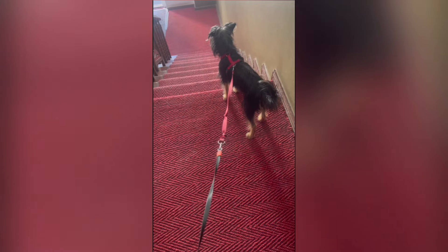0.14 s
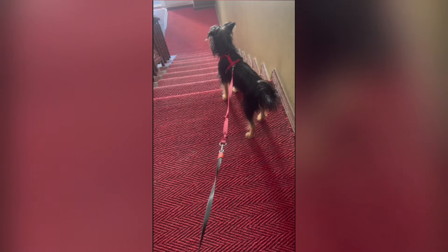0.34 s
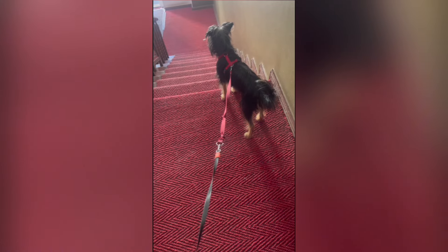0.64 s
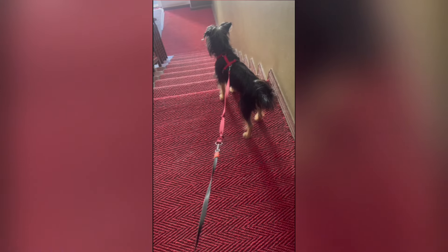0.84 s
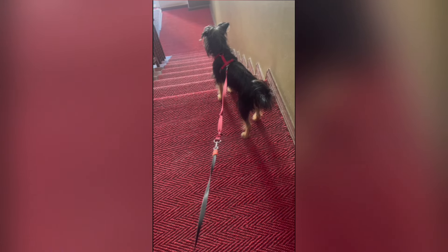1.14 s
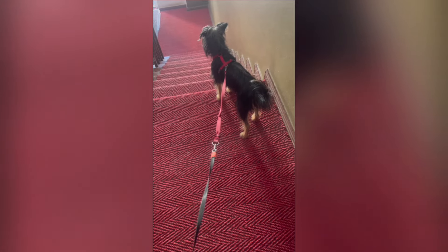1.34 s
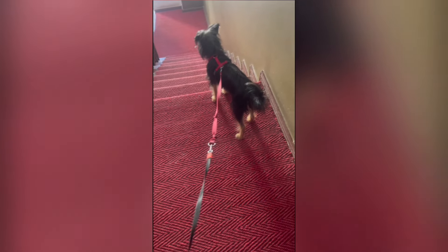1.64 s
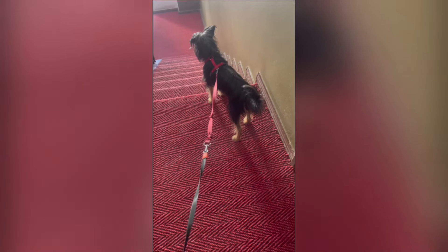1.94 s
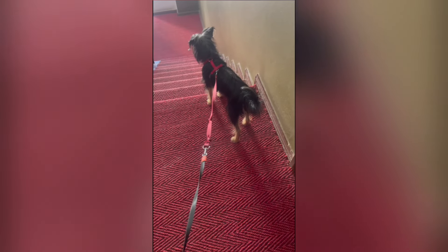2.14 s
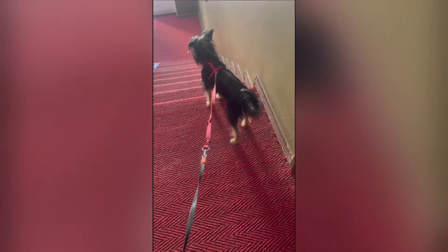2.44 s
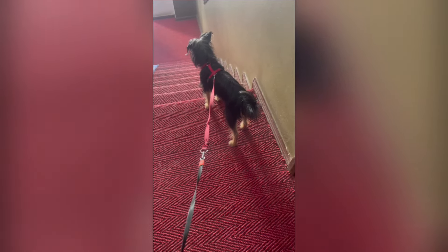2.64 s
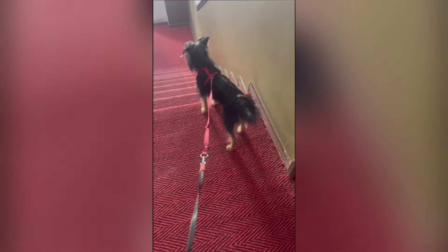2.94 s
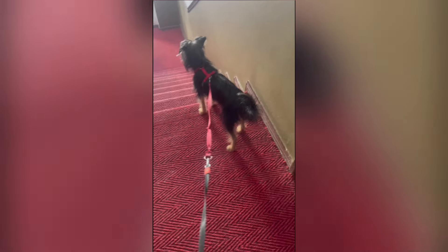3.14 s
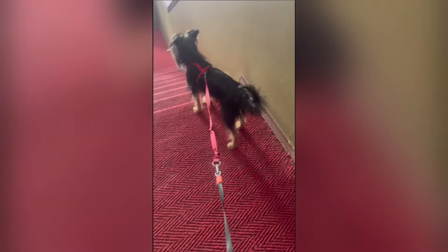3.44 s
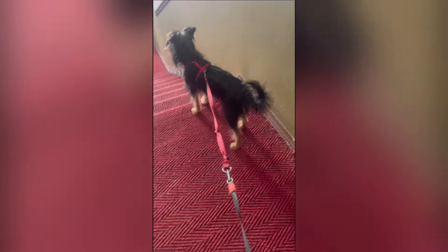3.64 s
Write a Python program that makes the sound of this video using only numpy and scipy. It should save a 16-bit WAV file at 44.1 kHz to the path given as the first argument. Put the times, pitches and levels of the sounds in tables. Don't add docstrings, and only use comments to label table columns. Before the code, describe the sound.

A small dog whines in a carpeted stairwell with short reverberation and low rumble. A soft grunt opens, then a thin nasal whistle at 0.25 s; weak grunts and faint sniffs follow until 1.1. Leash clicks at 1.2 and 1.45 accompany a hissing whistle, breaking into a falling yelp at 1.8. More whistling leads to a second yelp at 2.55. After a click at 3.2, a long whine slides down to the end over paw thuds.

```python
import sys
import numpy as np
from scipy import signal
from scipy.fft import rfft, irfft
from scipy.io import wavfile
from scipy.ndimage import uniform_filter1d

SR = 44100
rng = np.random.default_rng(int(sys.argv[2]) if len(sys.argv) > 2 else 0)


def makeup_ratio(level_db):
    decades = np.asarray(level_db, float) / 20
    return 10 ** decades


def materialize(psi):
    bounded = np.clip(np.atleast_2d(psi).T, -1, 1)
    quanta = np.round(bounded * 32767).astype(np.int16)
    wavfile.write(sys.argv[1], SR, quanta)


N = 167580

# frequency in Hz, density in dB per Hz.
AIR_SPECTRUM = [(30, -29), (130, 6), (300, 14.5), (3400, -7), (7800, -14), (8800, -35.5), (13200, -63)]
# frequency in Hz, density in dB per Hz.
HOUSE_SPECTRUM = [(30, -36.5), (55, 10.5), (110, -6), (250, -1.5), (500, -22), (4000, -34), (12500, -40),
                  (13200, -81)]
AIR_DB, HOUSE_DB = -59.5, -52.5
# time in seconds, boost in dB.
FOOTFALL_SWELL = [(0, 13.5), (0.398, 6), (1.05, 2.5), (1.249, -6), (2.402, -2), (2.696, 5.5), (3.8, 3.5)]

# time in seconds, pitch in Hz, level in dB, breathiness
GRUNTS = [
    [(0, 416.5, -34, 0.09), (.04, 389, -46.5, 0.85), (.07, 352, -49.5, 0.7)],
    [(0, 1061, -47, 0.8), (.05, 1056, -47, 0.21)],
    [(.475, 527, -78, 0.16), (.5, 504, -48.5, 0), (.58, 431.5, -47, 0.6), (.67, 409, -56.5, 0.5),
     (.8, 375, -64, 1)],
    [(.85, 373.5, -47.5, 0.64), (.87, 370, -57.5, 1), (.91, 370.6, -83.5, 0.92), (.955, 397, -50, 1),
     (.98, 338.4, -43.5, 0.2), (1.03, 336, -49.5, 0.02), (1.085, 354, -74, 0.15)],
]
# time in seconds, pitch in Hz, level in dB, breathiness from 0 to 1.
YELPS = [
    [(1.6, 1371, -67.5, 0.5), (1.64, 1346, -67, 0.8), (1.8, 1275, -65, 0.66), (1.812, 1303, -23, 0),
     (1.822, 1066, -15, 0.12), (1.832, 894.7, -37, 0.98), (1.855, 595, -33, 1), (1.875, 457, -80, 0.8)],
    [(2.515, 1142, -57.5, 0), (2.533, 1171, -18, .01), (2.56, 1145, -19.5, 0), (2.573, 1078, -14.5, 0.02),
     (2.585, 979.2, -30.5, 0.2), (2.62, 456.6, -30, 0.65), (2.635, 376.2, -16.5, 0.01),
     (2.665, 338, -32, 0.2), (2.7, 355, -53, .1)],
]
# time in seconds, pitch in Hz, level in dB.
LONG_WHINE = [(3.245, 1288, -50), (3.274, 1277, -32.5), (3.302, 1200, -21), (3.344, 1150, -30),
              (3.383, 1083, -19.5), (3.497, 1037, -20.5), (3.599, 934, -21.5), (3.682, 861.6, -23.5),
              (3.81, 900.5, -18.5)]
# frequency in Hz, gain in dB.
THROAT = [(370, 9), (750, -7), (1150, -5), (1700, -38), (2400, -27), (3800, -44.5), (5700, -28),
          (12000, -75)]
# frequency in Hz, gain in dB.
WHINE_THROAT = [(1100, 0), (2200, -22), (2480, -36), (3230, -25), (3620, -48), (4780, -26), (5500, -26),
                (8000, -31)]
# frequency in Hz, gain in dB.
BREATH_COLOUR = [(150, -55), (350, -12), (1000, -2.5), (1800, -27.5), (2700, -4.5), (4000, -25),
                 (5500, -15), (13000, -48.5)]

# frequency in Hz, time to fall 60 dB in seconds.
STAIRWELL_RING = [(350, 0.64), (1000, 0.34), (2500, 0.25), (6000, 0.3), (14000, 0.24)]

# time in seconds, peak in dB, centre in Hz, length in seconds.
TICKS = [
    (0.157, -59, 1500, 0.11),
    (0.254, -54.5, 2000, 0.028),
    (3.1, -58, 600, 0.066),
    (3.13, -58, 1300, 0.059),
    (3.2, -51, 4000, .012),
    (3.215, -55.5, 1550, 0.049),
    (3, -52, 4000, .015),
    (1.55, -51.5, 8100, .015),
    (1.3, -63, 850, 0.018),
    (1.1, -62.5, 980, 0.01),
]
# frequency in Hz, gain in dB.
NOSE_COLOUR = [(2500, -21), (4300, -5.5), (5200, 11), (6300, 5.5), (8000, 5), (12500, -19.5),
               (13000, -27.5), (15500, -31)]
# time in seconds, level in dB.
AIRFLOW = [(0.201, -76), (.27, -48), (0.399, -76), (1.298, -82.5), (1.36, -63), (1.53, -47), (1.802, -45),
           (1.861, -77), (2.058, -73.5), (2.13, -55.5), (2.582, -45.5), (2.681, -80), (2.85, -73.5),
           (2.931, -51.5), (3.1, -60), (3.349, -46), (3.8, -61)]
# time in seconds, pitch in Hz, level in dB.
WHISTLES = [
    [(.225, 5400, -61), (.242, 5159, -38.5), (.28, 5230, -26), (.3, 5150, -37.5), (.33, 4950, -45.5),
     (.37, 4630, -43)],
    [(1.3, 4900, -55), (1.345, 5653, -34), (1.4, 5900, -31.5), (1.462, 6280, -27.5), (1.485, 6060, -28),
     (1.505, 5846, -26.5), (1.56, 6040, -29.5), (1.634, 6260, -42), (1.79, 6276, -51.5)],
    [(2.06, 5900, -71), (2.1, 6210, -33.5), (2.16, 6344, -34.5), (2.2, 6150, -36), (2.235, 5630, -32.5),
     (2.34, 5822, -35.5), (2.365, 5918, -31), (2.45, 5830, -31.5), (2.59, 5740, -62.5)],
    [(2.86, 6060, -91), (2.9, 5907, -35), (2.956, 5881, -33), (3.01, 5752, -42), (3.08, 5964, -68)],
    [(3.275, 6050, -59), (3.3, 5950, -28.5), (3.33, 5880, -36), (3.365, 5850, -49)],
]
# time in seconds, pitch in Hz, level in dB.
SQUEAKS = [
    [(.24, 15900, -69), (.3, 15200, -66), (.345, 15100, -70)],
    [(1.32, 14840, -68), (1.44, 14730, -67)],
    [(1.46, 14400, -60.5), (1.5, 14700, -56), (1.6, 14900, -60.5), (1.85, 15200, -59.5)],
    [(2.3, 13400, -77), (2.51, 14950, -50.5), (2.64, 14850, -69.5)],
    [(3.2, 14270, -82), (3.32, 15200, -58), (3.56, 14500, -78.5)],
]
# time in seconds, level in dB.
SNIFFS = [
    (0.857, -70.5),
    (0.919, -63.5),
    (0.957, -58.5),
]
SNIFF_HZ = [2520, 5230, 5900, 7500]
# time in seconds, peak in dB, centre in Hz.
CLIP_SNAPS = [
    (1.228, -31, 2530),
    (1.455, -31, 2050),
    (3.202, -31, 3980),
]
# time in seconds, peak in dB, centre in Hz.
THUDS = [
    (3.414, -48, 493),
    (3.499, -34.5, 463),
    (3.663, -33, 513),
    (3.793, -38.5, 907),
]

# frequency in Hz, left over right in dB.
SIDE_TILT = [(60, -.4), (300, 2.7), (1100, -1.8), (2500, .6), (5000, -.3), (8000, 0)]
# frequency in Hz, left lead in radians.
PORT_PHASE = [(300, -0.21), (3500, 1.22), (6000, 1.27), (7200, 1.91)]
# frequency in Hz, radians short of opposed.
TREBLE_SHORTFALL = [(8500, .45), (11000, .5), (12200, .75), (15000, 1.0)]

PITCH_WAVER = 0.0028
FLICKER_DB, FUZZ = 3.5, 0.4


def evened(x):
    return x / np.sqrt(np.mean(x ** 2) + 1e-20)


def read(points, hz):
    f, value = np.transpose(points)
    return np.interp(np.log(hz + 1), np.log(f + 1), value)


def add(mix, s, sound):
    part = mix[round(s * SR):][:len(sound)]
    part += sound[:len(part)]


def colour(x, gain):
    spectrum = rfft(x) * gain(np.fft.rfftfreq(x.shape[-1], 1 / SR))
    return irfft(spectrum, x.shape[-1])


def octave_band(hz, octaves):
    return lambda f: np.exp(-(np.log2((f + 1) / hz) / octaves) ** 2)


def flicker(n, rate_hz):
    wander = colour(rng.standard_normal(SR), lambda f: np.exp(-(f / rate_hz) ** 2))
    return evened(wander)[:n]


def unroll(rows):
    rows = np.array(rows, float)
    t = np.arange(rows[0, 0], rows[-1, 0], 1 / SR)
    controls = [uniform_filter1d(np.interp(t, rows[:, 0], v), size=150) for v in rows.T[1:]]
    hz = controls[0]
    wobble = evened(uniform_filter1d(rng.standard_normal(SR), size=300))[:len(t)]
    phase = 2 * np.pi * np.cumsum(hz * (1 + PITCH_WAVER * wobble)) / SR
    fade_in = np.clip((t - t[0]) / 0.00074, 0, 1)
    fade_out = np.clip((t[-1] - t) / 0.002, 0, 1)
    level = makeup_ratio(controls[1]) * fade_out * fade_in
    return t[0], hz, phase, level, controls[-1]


def drone(spectrum, db, patchy_db):
    frames, hz = N // 256 + 5, np.fft.rfftfreq(1024, 1 / SR)
    real, imaginary, patches = rng.standard_normal((frames, 513, 3)).T
    patches = uniform_filter1d(patches, size=8, axis=0)
    patches = evened(uniform_filter1d(patches, size=14, axis=1))
    swell = np.interp(np.arange(frames) * 256 / SR, *np.transpose(FOOTFALL_SWELL))
    swell = swell / (1 + (hz[:, None] / 500) ** 2)
    gain = makeup_ratio(read(spectrum, hz)[:, None] + patchy_db * patches + swell)
    noise = signal.istft((real + 1j * imaginary) * gain, nperseg=1024, noverlap=768)[1][:N]
    return makeup_ratio(db) * evened(noise)


def voice(rows, bright_db=0, fade_db=0, breath_db=0, breath_top_hz=20000, rough=0, throat=THROAT):
    s, hz, phase, level, breathy = unroll(rows)
    n = len(phase)
    brightness = makeup_ratio(bright_db + fade_db * np.arange(n) / SR - read(throat, hz))
    brightness = brightness * (level / level.max()) ** 0.44
    fundamental = (1 + rough * flicker(n, 87)) * np.sin(phase)
    overtones = 0
    for k in range(2, 16):
        weight = makeup_ratio(read(throat, k * hz) + FLICKER_DB * flicker(n, 6))
        overtones = overtones + weight * (1 + FUZZ * flicker(n, 89)) * np.sin(k * phase)
    tone = fundamental + brightness * overtones
    breath = colour(rng.standard_normal(SR),
                    lambda f: makeup_ratio(read(BREATH_COLOUR, f)) / (1 + (f / breath_top_hz) ** 4))
    breath = evened(breath)[:n] * (1 + 0.66 * np.cos(phase))
    return s, level * (np.sqrt(2) * tone + makeup_ratio(breath_db) * np.clip(breathy, 0, 1) * breath)


def stairwell(x):
    gap_s, room_db, apart_db, apart_top_hz = 0.0051, -5, -9, 7000
    taps = np.zeros((2, SR))
    at = np.arange(0, SR - 20, 20) + rng.integers(0, 20, (2, SR // 20 - (SR % 20 == 0)))
    np.put_along_axis(taps, at, rng.choice([-1., 1.], at.shape), 1)
    taps *= np.clip(np.arange(SR) / SR / gap_s - 1, 0, 1)
    hz, t, z = signal.stft(taps, SR, nperseg=256)
    decay = makeup_ratio(-60 * t / read(STAIRWELL_RING, hz)[:, None])
    tail = signal.istft(z * decay, SR, nperseg=256)[1]
    both, apart = signal.fftconvolve(x[None], tail / np.linalg.norm(tail[0]), axes=1)[:, :N]
    apart = colour(apart, lambda f: 1 / (1 + (f / apart_top_hz) ** 8))
    return makeup_ratio(room_db) * (both + makeup_ratio(apart_db) * np.array([apart, -apart]))


def tick(s, db, hz, length, octaves):
    t = np.arange(4096) / SR
    noise = colour(rng.standard_normal(4096), octave_band(hz, octaves))
    return s, makeup_ratio(db) * evened(noise) * np.minimum(t / 0.00023, 1) * np.exp(-t / length)


def nose():
    hiss = evened(colour(rng.standard_normal(N), lambda f: makeup_ratio(read(NOSE_COLOUR, f))))
    return hiss * makeup_ratio(np.interp(np.arange(N) / SR, *np.transpose(AIRFLOW)))


def whistle(rows):
    s, hz, phase, level, _ = unroll(rows)
    n = len(phase)
    tone = (1 + 0.55 * flicker(n, 70)) * np.sin(phase)
    octave_level = makeup_ratio(-26.5 + FLICKER_DB * flicker(n, 20))
    tone += octave_level * (1 + FUZZ * flicker(n, 200)) * np.sin(2 * phase)
    tremble = makeup_ratio(3.0 * flicker(n, 20))
    return s, level * np.sqrt(2) * tremble * tone


def squeak(rows):
    s, hz, phase, level, _ = unroll(rows)
    return s, level * np.sqrt(2) * flicker(len(phase), 450) * np.sin(phase)


def clip_snap(s, db, hz, octaves):
    snap = colour(signal.unit_impulse(1024, "mid"), octave_band(hz, octaves))
    return s - 512 / SR, makeup_ratio(db) * snap / abs(snap).max()


def scene():
    dog = nose()
    for rows in WHISTLES:
        add(dog, *whistle(rows))
    for rows in SQUEAKS:
        add(dog, *squeak(rows))
    for rows in GRUNTS:
        add(dog, *voice(rows, bright_db=-9.5, breath_db=-3.5, breath_top_hz=800, rough=0.5))
    for rows in YELPS:
        add(dog, *voice(rows))
    whine = [(*row, 0.025) for row in LONG_WHINE]
    add(dog, *voice(whine, bright_db=4, fade_db=-44, throat=WHINE_THROAT))
    for row in TICKS:
        add(dog, *tick(*row, octaves=0.78))
    for row in CLIP_SNAPS:
        add(dog, *clip_snap(*row, octaves=0.94))
    for s, db in SNIFFS:
        for hz in SNIFF_HZ:
            add(dog, *tick(s, db, hz, length=0.019, octaves=0.35))
    for row in THUDS:
        add(dog, *tick(*row, length=0.0057, octaves=0.87))
    air = drone(AIR_SPECTRUM, AIR_DB, patchy_db=1.5)
    room = stairwell(dog)
    house = drone(HOUSE_SPECTRUM, HOUSE_DB, patchy_db=2.0)
    return dog + room + house + np.array([air, -air])


def roll_off(x):
    return signal.sosfilt(signal.butter(12, 16720, fs=SR, output="sos"), x)


def record(dry):
    top_hz = 15750
    phase = list(map(tuple, PORT_PHASE)) + [(hz, np.pi - short) for hz, short in TREBLE_SHORTFALL]

    def port(f):
        return makeup_ratio(read(SIDE_TILT, f) / 2) * np.exp(0.5j * read(phase, f))

    left, right = np.pad(dry, ((0, 0), (SR, SR)), "reflect", reflect_type="odd")
    pair = np.array([colour(left, port), colour(right, lambda f: 1 / port(f))])
    mix = colour(pair, lambda f: f < top_hz)[:, SR:-SR]
    return roll_off(mix)


dry = scene()
out = record(dry)
materialize(out)
```